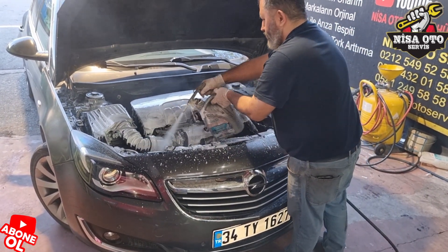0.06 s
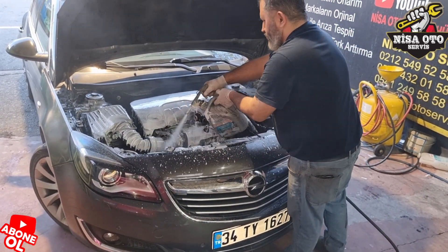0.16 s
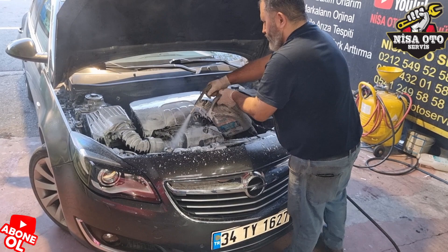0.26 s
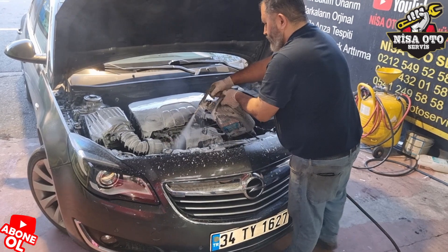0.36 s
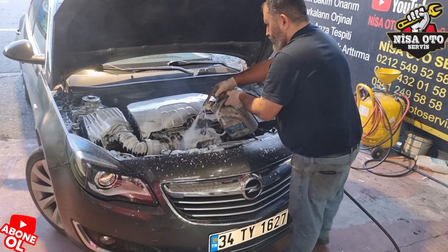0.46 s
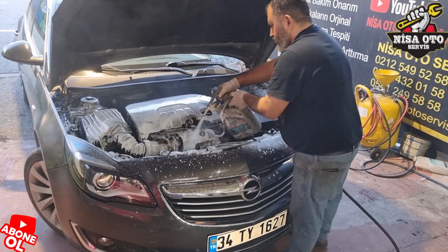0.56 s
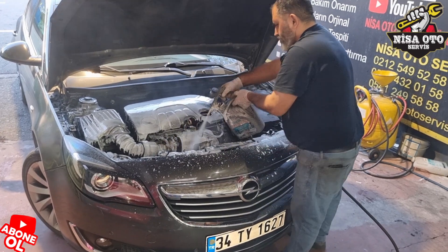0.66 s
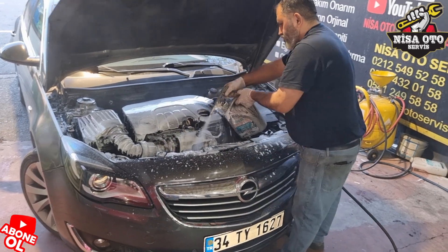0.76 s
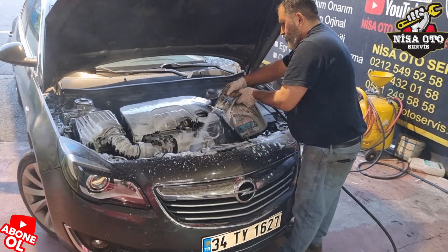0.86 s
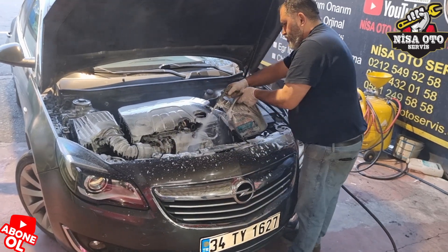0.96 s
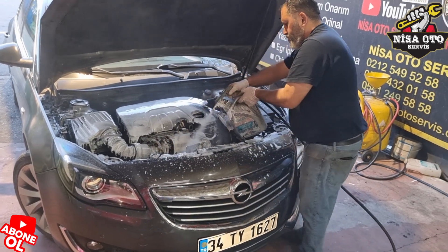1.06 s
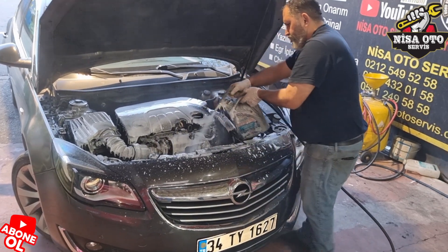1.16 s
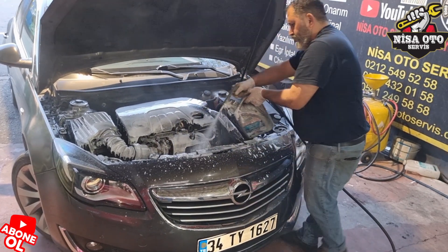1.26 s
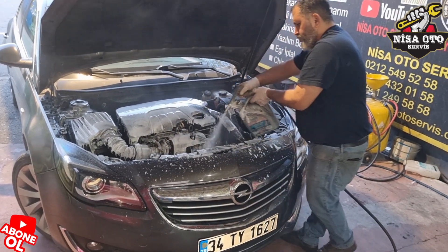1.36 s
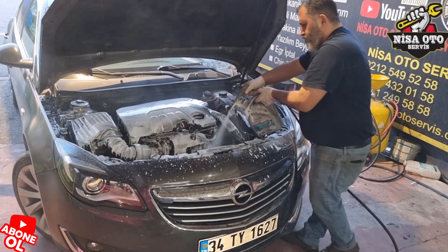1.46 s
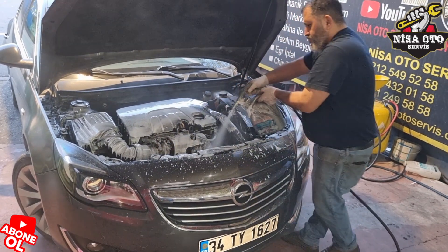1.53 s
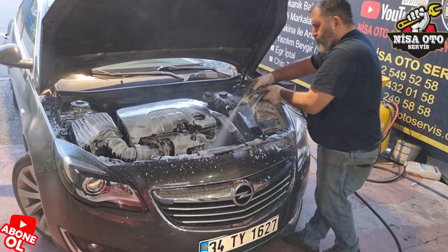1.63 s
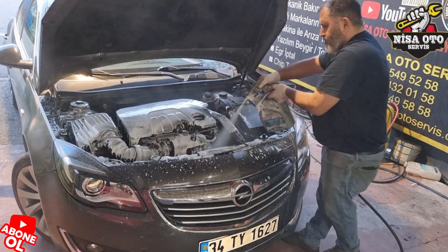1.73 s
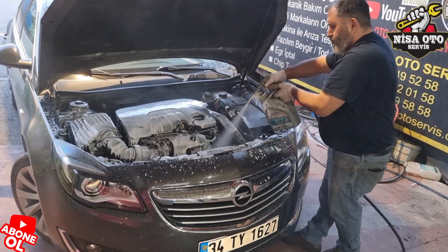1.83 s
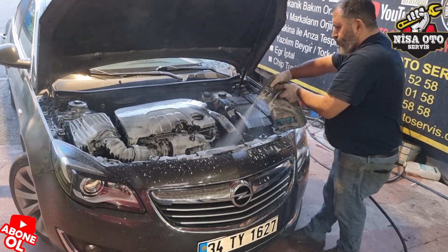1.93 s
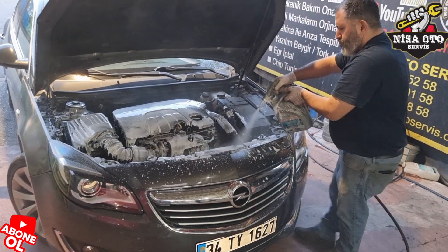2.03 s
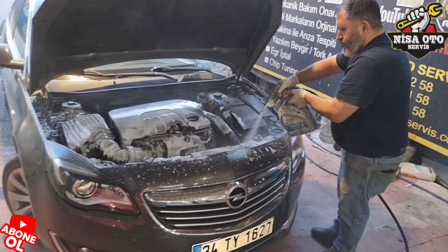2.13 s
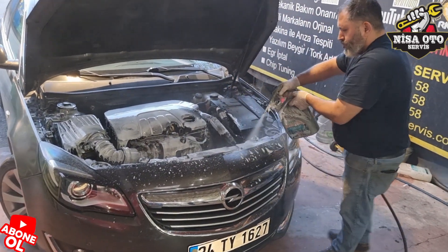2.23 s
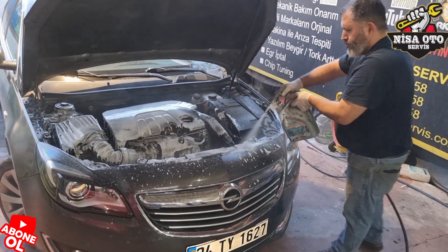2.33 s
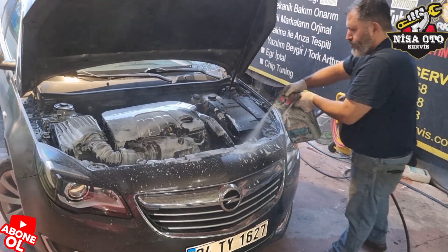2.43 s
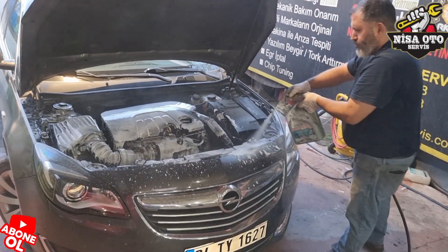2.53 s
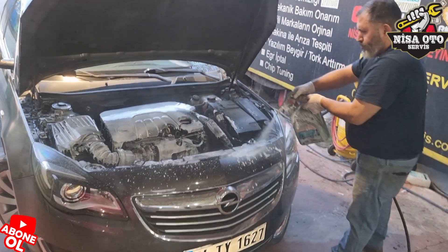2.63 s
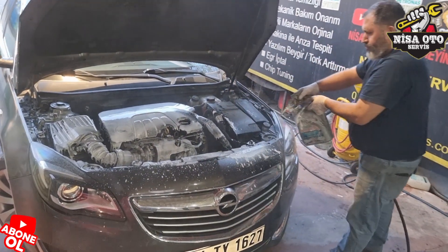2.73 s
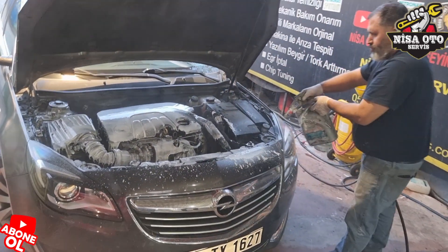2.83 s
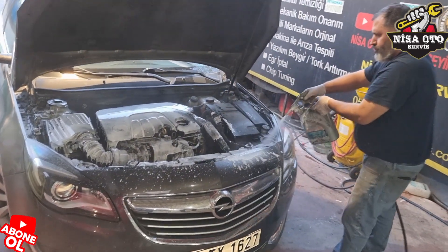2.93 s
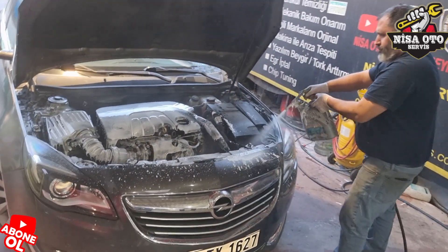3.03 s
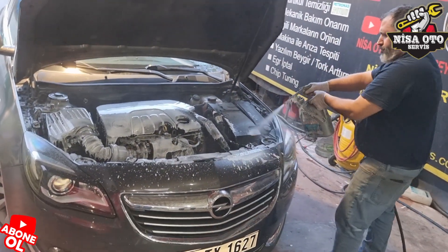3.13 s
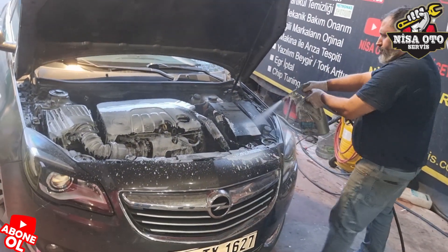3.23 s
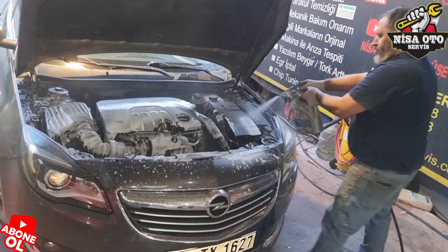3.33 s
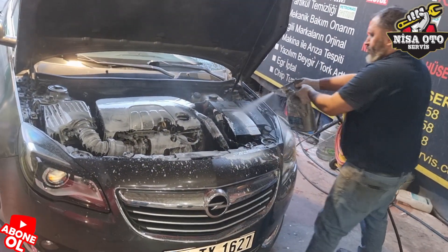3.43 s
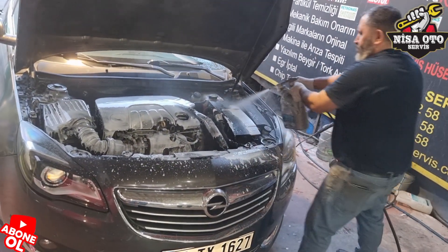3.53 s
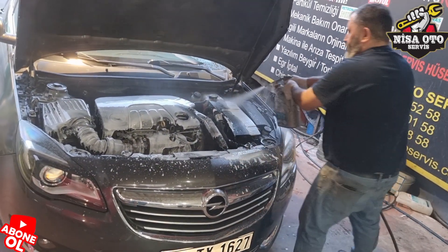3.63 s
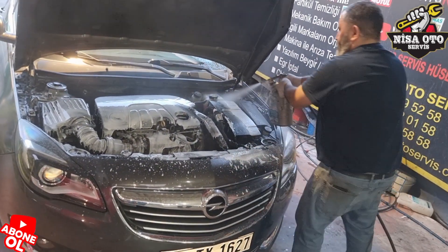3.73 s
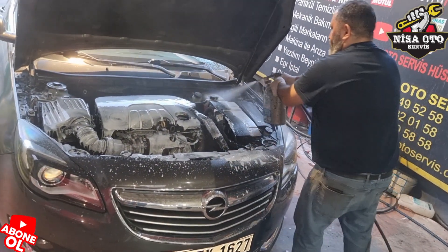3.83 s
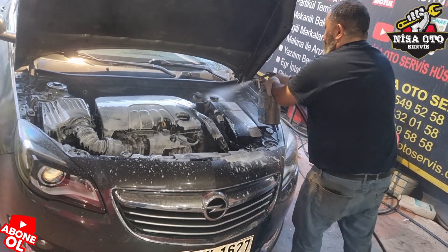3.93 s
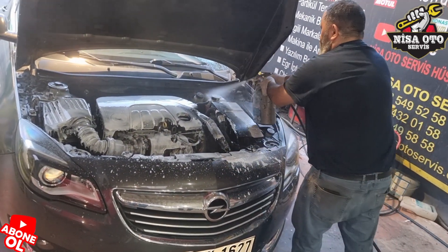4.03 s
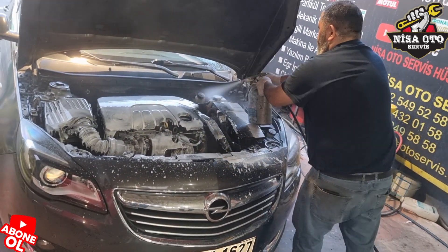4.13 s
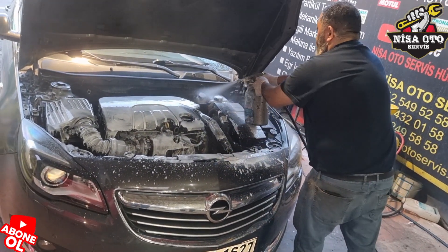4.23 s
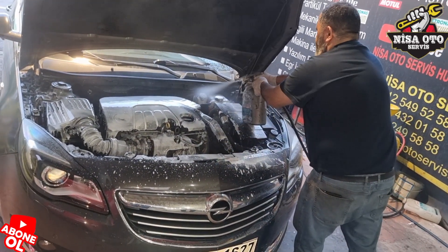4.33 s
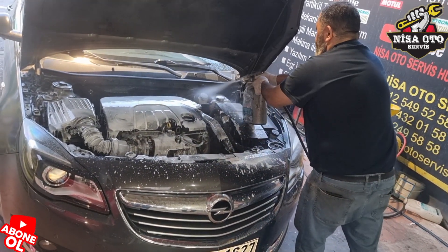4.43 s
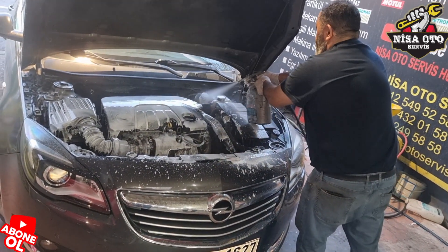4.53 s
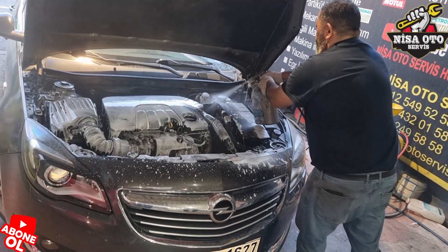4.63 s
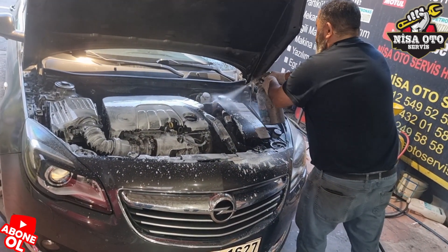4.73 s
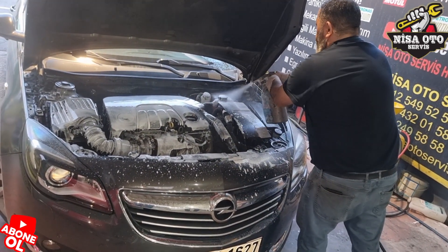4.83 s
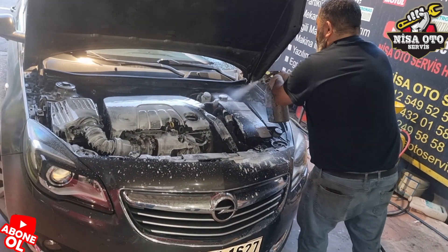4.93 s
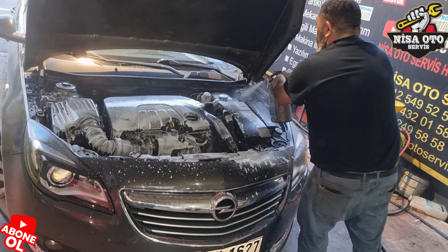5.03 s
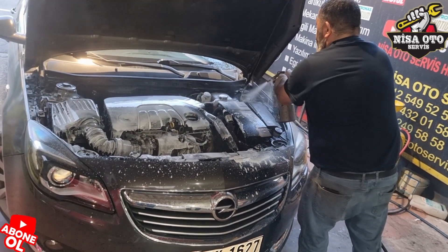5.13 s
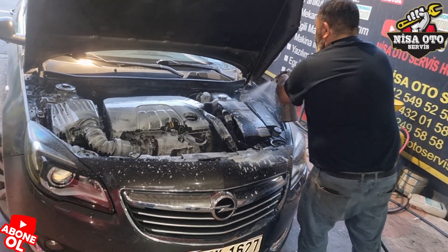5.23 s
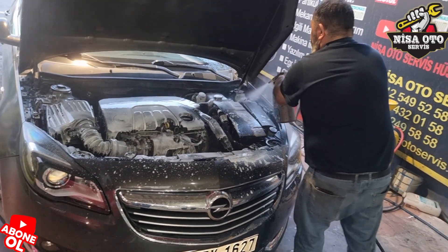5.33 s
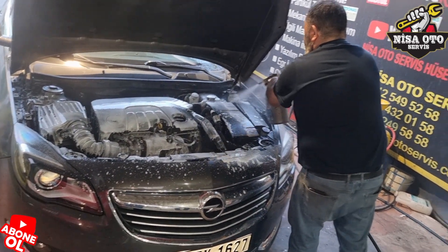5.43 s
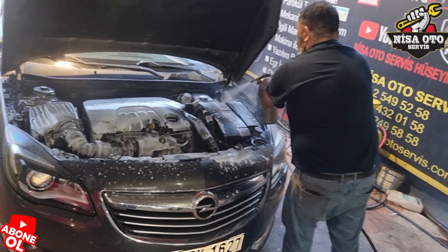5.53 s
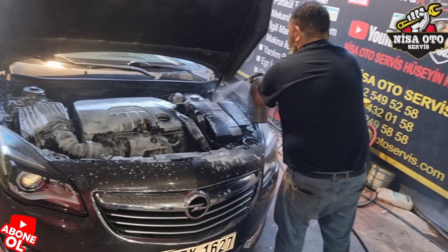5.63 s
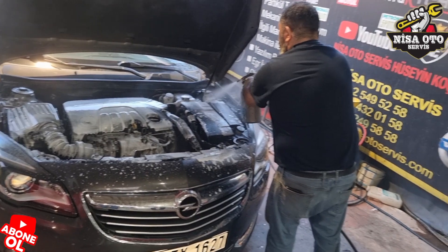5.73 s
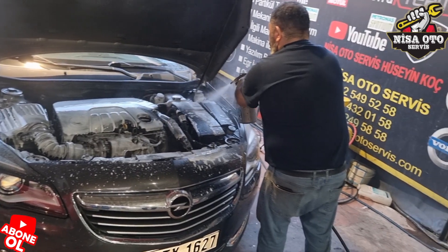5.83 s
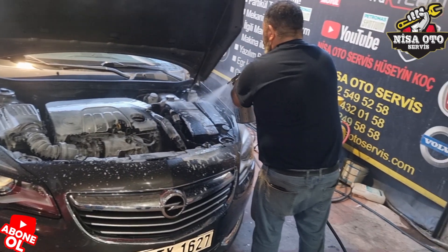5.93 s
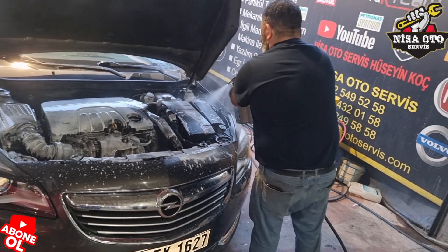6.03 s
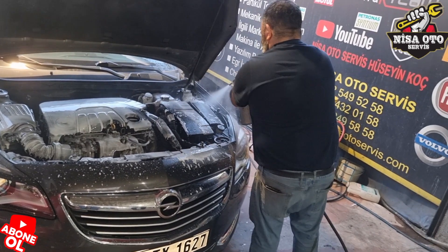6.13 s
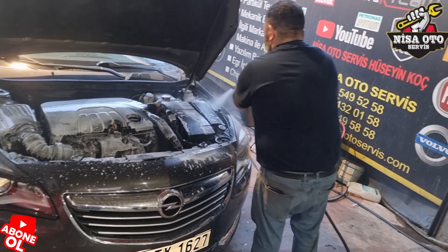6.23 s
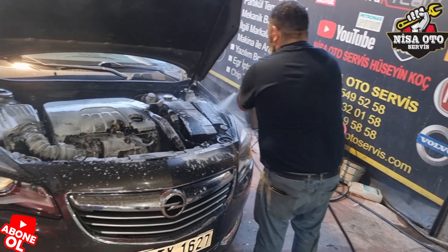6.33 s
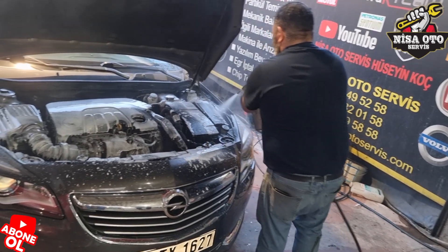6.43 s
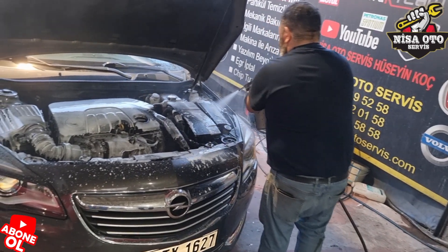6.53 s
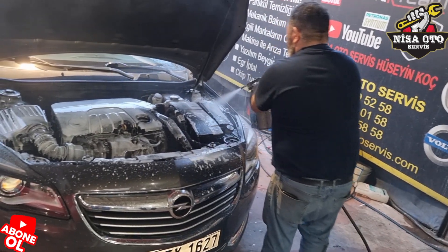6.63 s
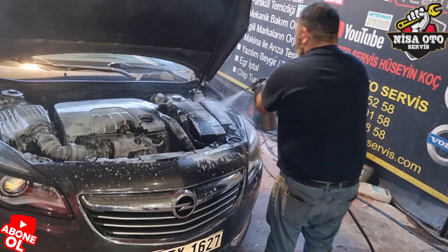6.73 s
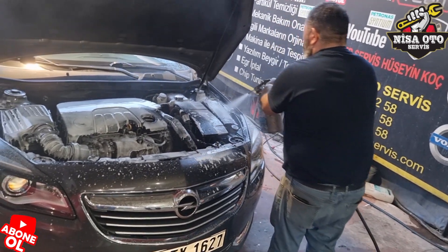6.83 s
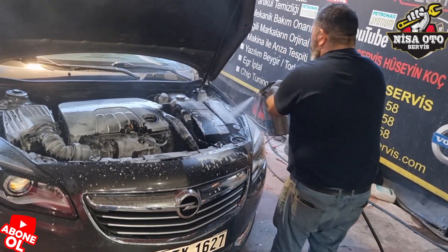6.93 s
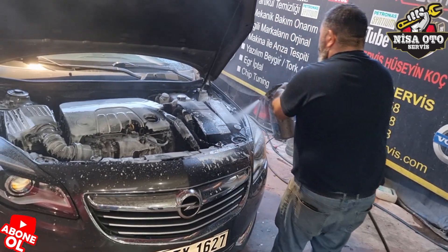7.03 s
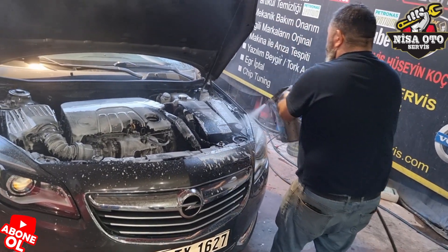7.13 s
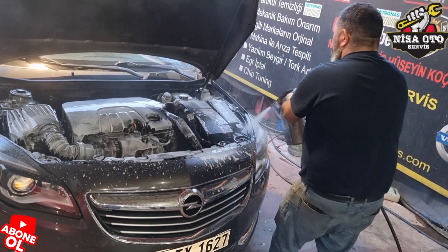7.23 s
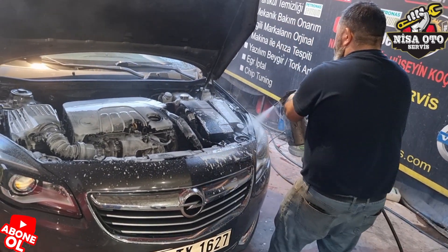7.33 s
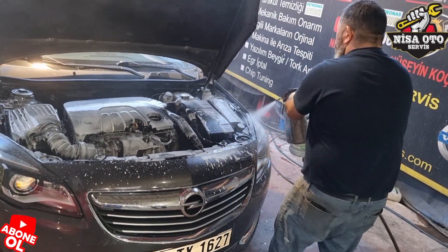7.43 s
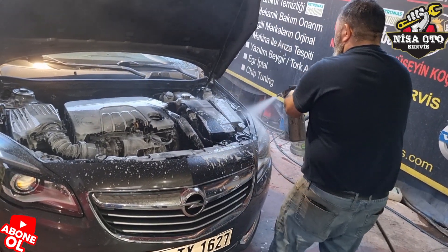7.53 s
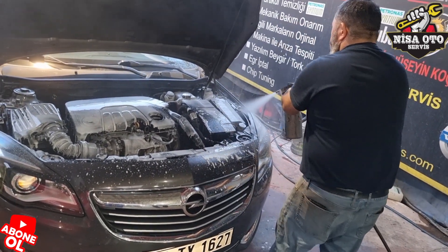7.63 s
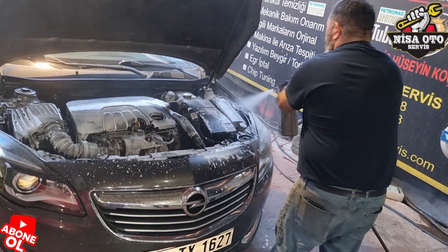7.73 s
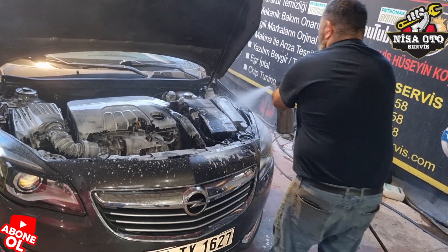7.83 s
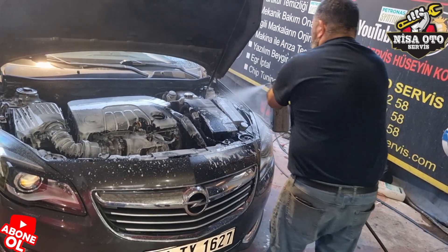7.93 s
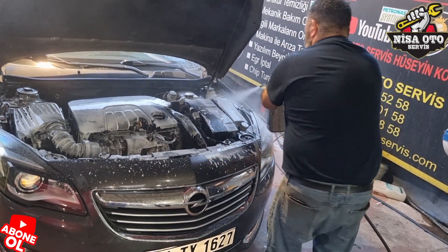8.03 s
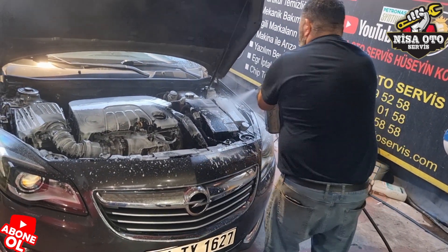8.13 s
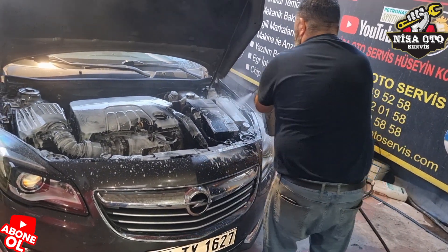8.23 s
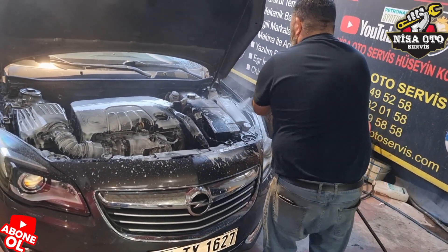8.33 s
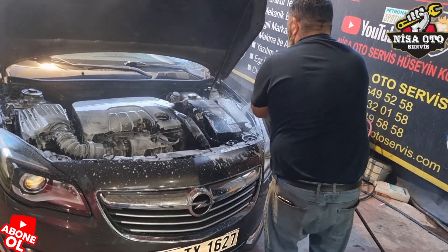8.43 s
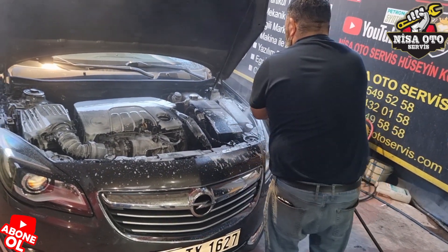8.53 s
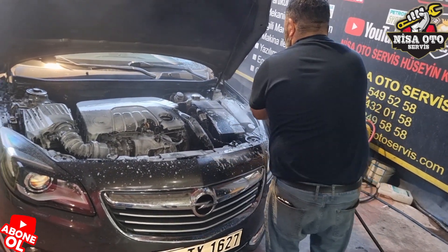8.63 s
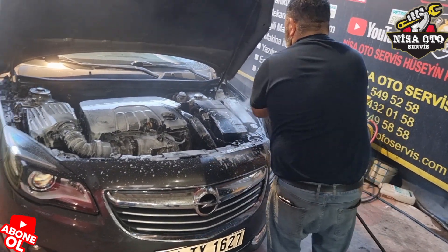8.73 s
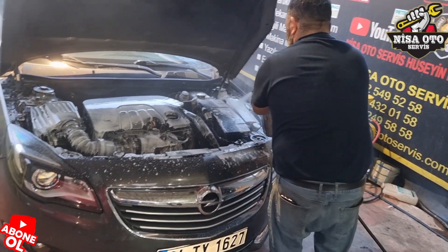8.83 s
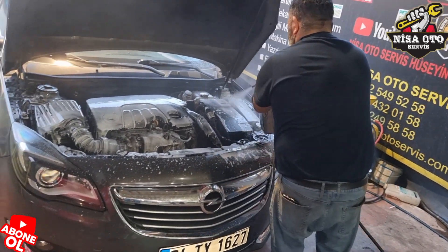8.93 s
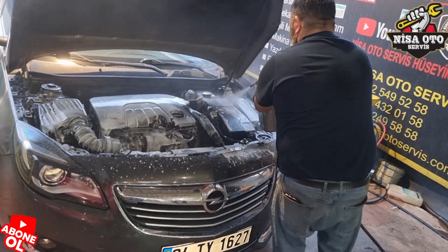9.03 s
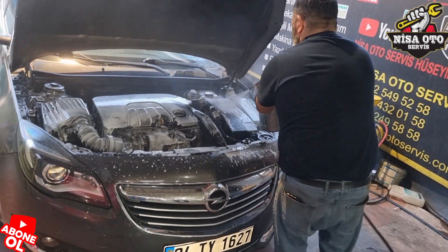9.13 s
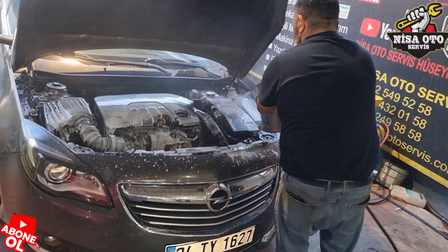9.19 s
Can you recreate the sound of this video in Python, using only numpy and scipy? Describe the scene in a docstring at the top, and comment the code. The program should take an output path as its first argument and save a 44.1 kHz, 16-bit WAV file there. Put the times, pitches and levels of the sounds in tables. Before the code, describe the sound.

In a hard, ringing garage, an air-driven spray gun blasts a bright, dense hiss into an open engine bay. A low rattling drone swells early on. The trigger is released for a fraction of a second, leaving the echo, then pulled again with two hollow knocks. A metal panel clangs shortly after. The hiss continues to the end, over faint traffic rumble, heard close by in stereo.

```python
"""Spray gun in a workshop.

An air-driven gun mists an open engine bay: a shaped noise jet with moving echo streaks, in a ringing hall.
The trigger is let go once, so the hall rings on alone, and is soon pulled again.
Behind: a low drone and a clanging panel (noise resonances and wavering tones), dull knocks (decaying sines),
and the street (lumpy noise rumble) with a machine hum and air-line hiss."""
import sys
import numpy as np
from scipy import signal
from scipy.io import wavfile
from scipy.ndimage import uniform_filter1d

SR = 44100
rng = np.random.default_rng(int(sys.argv[2]) if len(sys.argv) > 2 else 0)


def dump(signal):
    """Clip the signal to [-1, 1] and save it as 16-bit WAV at the path in sys.argv[1]."""
    limited = np.clip(np.atleast_2d(signal).T, -1, 1)
    pcm = np.round(limited * 32767).astype(np.int16)
    wavfile.write(sys.argv[1], SR, pcm)


N = 408366  # samples


def gain_of(db):
    """Amplitude factor of a level in dB."""
    return 10 ** (np.asarray(db) / 20)


def evened(x):
    """Scale to rms 1."""
    return x / np.sqrt(np.mean(x ** 2) + 1e-20)


def read(points, f_hz):
    """Interpolate a (f/Hz, value) table over log frequency."""
    table_hz, value = np.transpose(points)
    return np.interp(np.log(f_hz + 1), np.log(table_hz + 1), value)


def follow(rows, t_s):
    """Interpolate every column of a table over its first, t/s."""
    row_s, *columns = np.transpose(rows)
    return [np.interp(t_s, row_s, column) for column in columns]


def swell(start_s, rise_s, hold_s, fade_db_per_s, level_db):
    """Envelope: linear rise, hold, then a fade at a steady dB rate."""
    t_s = np.arange(N) / SR - start_s
    fade_s = np.clip(t_s - rise_s - hold_s, 0, None)
    return np.clip(t_s / rise_s, 0, 1) * gain_of(level_db - fade_db_per_s * fade_s)


def ringing(f_hz, width_hz):
    """Noise through one resonance (two equal poles): a fuzzy tone of rms 1."""
    pole = np.exp(-np.pi * width_hz / SR)
    carrier = np.exp(2j * np.pi * f_hz * np.arange(N) / SR)
    slow = rng.standard_normal(N) / carrier
    for _ in range(2):
        slow = signal.lfilter([1], [1, -pole], slow)
    return evened((slow * carrier).real)


def steady(f_hz, waver):
    """Fixed-pitch sine whose amplitude wavers by the given rms share."""
    drift = evened(uniform_filter1d(rng.standard_normal(N), size=2500))
    phase = 2 * np.pi * (f_hz * np.arange(N) / SR + rng.random())
    return np.sqrt(2) * (1 + waver * drift) * np.sin(phase)


def patches(frames, bins, long, wide, count=2):
    """Smoothed noise fields (count, bin, frame) of rms 1: blobs over time and frequency."""
    noise = rng.standard_normal((frames, bins, count)).T
    for _ in range(2):
        noise = uniform_filter1d(noise, long, 2)
    return evened(uniform_filter1d(noise, wide, 1))


# jet spectrum: f/Hz, relative level/dB per Hz
JET_SPECTRUM = [(180, -29), (320, -19.5), (480, -20), (900, -16), (1250, -13), (1650, -12.5), (2150, -1),
                (2800, -3.5), (3900, -2), (5200, -1.5), (6200, -5), (7700, -5.5), (8300, -9.5),
                (11000, -12), (13000, -9), (15500, -8)]
# centres of wash, roar, hiss, sizzle, fizz: f/Hz
BAND_CENTRES_HZ = [1250, 2300, 3700, 6000, 11500]
# gun sweep: t/s, level change/dB, extra wash level/dB, extra hiss-band level/dB
GUN_SWEEP = [(0.0, 0.5, -2, -3), (0.25, .5, -0.5, 1.5), (0.75, 0.46, 1.5, -1.8), (1.4, 0.55, 0.5, -0.5),
             (1.75, 0, -0.5, -1), (2.2, .3, 1.5, 0.1), (2.6, -0.2, 0, 1.5), (3.2, 0.45, 0, -2.5),
             (3.7, -0.9, -3, 4), (4.2, -1.1, 1.5, .5), (4.7, -0.5, 0, -1), (5.15, -0.7, -.5, 2.5),
             (5.6, 0, -1.5, 0.7), (6.2, 0, -0.2, -1.5), (7.1, 1.14, -2.5, -0.5), (7.6, -0.8, -0.5, -.5),
             (7.95, 1, -1.5, -5), (8.45, -0.1, -1.5, 3), (8.85, -1, -0.5, 1), (9.26, 0, 1, -1)]
# channel balance: f/Hz, left-right level/dB
CHANNEL_TILT = [(60, 1.0), (120, -1), (240, -1.5), (480, 0), (950, -0.5), (1890, -1.5), (3770, -5),
                (7520, 2), (15000, -2)]
# trigger: let go t/s, pressure decay constant/s, pulled t/s, rise/s
TRIGGER_TIMES = (2.670, .011, 2.871, .021)
JET_DB = -20  # 3-8 kHz rms of the channel mean, trigger held
DRIFT_DB, DRIFT_FRAMES = 0.6, 24  # each band's own wander
ROAR_SHARE = 0.92  # roar follows wash by this much
PATCH_DB, SPIT_DB = 0.44, -0.58  # spectral blobs; feed flutter at 14 kHz and above
DELAY_S, BEND_RAD = -7e-5, 1.69  # interchannel phase: linear part, wander rms


def jet_field_db(frames, f_hz):
    """Level of the turbulent jet (channel, bin, frame) as aim and liquid feed vary."""
    level_db, wash_db, hiss_db = follow(GUN_SWEEP, np.arange(frames) * 256 / SR)
    bands = len(BAND_CENTRES_HZ)
    wander = patches(frames, bins=bands, long=DRIFT_FRAMES, wide=1, count=1)[0]
    shifts_db = level_db + DRIFT_DB * wander
    shifts_db[:3] += [wash_db, ROAR_SHARE * wash_db, hiss_db]
    weights = np.array([read(list(zip(BAND_CENTRES_HZ, row)), f_hz) for row in np.eye(bands)])
    field_db = read(JET_SPECTRUM, f_hz)[:, None] + weights.T @ shifts_db
    field_db = field_db + PATCH_DB * patches(frames, len(f_hz), long=7, wide=10, count=1)
    # uneven liquid feed: one flutter for all pitches, deeper towards the finest mist
    feed = evened(uniform_filter1d(rng.standard_normal(frames), size=7))
    field_db += SPIT_DB * np.clip(f_hz / 14000, 0, 1)[:, None] * feed
    return field_db + np.array([0.5, -0.5])[:, None, None] * read(CHANNEL_TILT, f_hz)[:, None]


def jet_paths(frames, f_hz):
    """Direct path plus bonnet and engine echoes: narrow streaks, different in each channel."""
    bins = len(f_hz)
    # short waves are reshuffled sooner by the same movement
    quick = np.clip(f_hz / 11000, 0, 1)[:, None]
    echo = np.sqrt(1 - quick) * patches(frames, bins, long=30, wide=2, count=4)
    echo += np.sqrt(quick) * patches(frames, bins, long=7, wide=3, count=4)
    bend_rad = BEND_RAD * patches(frames, bins, long=60, wide=12, count=1)[0]
    phase_rad = 2 * np.pi * f_hz[:, None] * DELAY_S + bend_rad
    direct = np.exp(1j * np.array([0, 1])[:, None, None] * phase_rad)  # right channel only
    return direct + echo[:2] + 1j * echo[2:]


def trigger():
    """Pressure gain: exponential decay on release, quadratic rise on pull, last fifth settling."""
    off_s, decay_s, on_s, rise_s = TRIGGER_TIMES
    t_s = np.arange(N) / SR
    closing = np.exp(-np.clip(t_s - off_s, 0, None) / decay_s)
    settling = 1 - 0.2 * np.exp(-np.clip(t_s - on_s, 0, None) / 0.017)
    opening = np.clip((t_s - on_s) / rise_s, 0, 1) ** 2 * settling
    return np.minimum(closing + opening, 1)


def spray():
    """One turbulent noise jet, coloured by aim and shifting echo paths, gated by the trigger."""
    frames, f_hz = N // 256 + 5, np.fft.rfftfreq(1024, 1 / SR)
    field_db = jet_field_db(frames, f_hz)
    real, imag = rng.standard_normal((frames, len(f_hz), 2)).T
    spectra = (real + 1j * imag) * jet_paths(frames, f_hz) * gain_of(field_db)
    jet = signal.istft(spectra, nperseg=1024, noverlap=768)[1][:, :N]
    bandpass = signal.butter(6, [3000, 8000], "band", fs=SR, output="sos")
    band = signal.sosfilt(bandpass, jet.mean(0))
    jet *= gain_of(JET_DB) / np.sqrt(np.mean(band ** 2))
    return jet * trigger()


# reverberation: f/Hz, t60/s
HALL_T60 = [(150, 0.44), (600, 1.15), (1400, 1.1), (2300, 1.2), (5000, 0.75), (9000, 0.51), (15000, 0.25)]
JET_HALL_DB, FAR_HALL_DB = -6, -4.0  # hall gain for the jet, for the far sounds


def hall(x):
    """Sparse random-sign echoes, one per 20 samples, each band dying at its own rate."""
    taps = np.zeros((2, SR))
    jitter = rng.integers(0, 20, (2, (SR - 401) // 20))
    at = np.arange(400, SR - 20, 20) + jitter
    np.put_along_axis(taps, at, rng.choice([-1., 1.], at.shape), 1)
    f_hz, t_s, z = signal.stft(taps, SR, nperseg=256)
    z = z * gain_of(-60 * t_s / read(HALL_T60, f_hz)[:, None])
    z /= np.linalg.norm(z, axis=2, keepdims=True) + 1e-12  # equal energy per band
    apart = np.clip(f_hz / 500, 0, 1)[:, None]  # long waves reach both channels alike
    z[1] = np.sqrt(1 - apart) * z[0] + np.sqrt(apart) * z[1]
    tail = signal.istft(z, SR, nperseg=256)[1]
    return signal.fftconvolve(x, tail / np.linalg.norm(tail[0]), axes=1)[:, :N]


# layers shaking panel, lowest ring, high ring, lingering hum:
# start t/s, swell/s, hold/s, fade/(dB/s), nominal level/dB
CLANG_LAYERS = [(3.767, 0.037, 0.092, 102, -21.5), (3.77, .04, 0.094, 95, -29),
                (3.777, 0.027, .18, 300, -32.5), (3.95, 0.49, .9, 117, -44)]
# panel modes: f/Hz, width/Hz, relative level/dB before sqrt(width) weighting
PANEL_MODES = [(135, 45, -6), (303, 100, -5), (413, 23, -3), (651, 12, 1.5), (772, 28, -4), (867, 25, -11),
               (990, 19, 1), (950, 16, 3.5), (1390, 23, 0)]
PANEL_LOW_HZ, PANEL_HIGH_HZ = 275, 1199


def clang():
    """Shaken metal sheet: many brief modes, two clear rings, the lowest lingering."""
    shake, ring, high, hum = (swell(*row) for row in CLANG_LAYERS)
    modes = evened(sum(gain_of(db) * np.sqrt(w) * ringing(f, w) for f, w, db in PANEL_MODES))
    rattle = np.array([ringing(630, width_hz=990) for channel in range(2)])
    body = 0.64 * np.array([np.roll(modes, 14), modes]) + 0.62 * rattle  # left 14 samples late
    low_tone = 0.7 * steady(PANEL_LOW_HZ, waver=0.25) + 0.2 * ringing(PANEL_LOW_HZ, width_hz=14.0)
    linger = 0.68 * ringing(PANEL_LOW_HZ, width_hz=8.2) + 0.87 * ringing(215, width_hz=190)
    high_tone = steady(PANEL_HIGH_HZ, waver=0.23)
    return shake * body + ring * low_tone + hum * linger + high * high_tone


# layers deep tones, middle tones, upper tone, loose rattle:
# start t/s, swell/s, hold/s, fade/(dB/s), nominal level/dB
DRONE_LAYERS = [(.295, 0.15, 0.23, 49, -27.5), (.296, .05, .1, 18, -28.5), (.3, .04, 0.49, 67, -39),
                (.3, .04, 0.071, 27, -31)]
# deep tones: f/Hz, relative level/dB
DRONE_DEEP = [(72, -6), (119, -3), (145, -3)]
# middle tones: f/Hz, relative level/dB
DRONE_MIDDLE = [(220, -2), (246, -1), (291, 0), (366, -9.5), (441, -14)]
DRONE_TOP_HZ = 550
MID_END_S, MID_DECAY_S = 0.82, 0.1  # extra decay of the middle tones: start, time constant


def drone():
    """Low tones of some machine or vehicle with a rattle: noise resonances that swell and fade."""
    low, mid, top, rattle = (swell(*row) for row in DRONE_LAYERS)
    deep = sum(gain_of(db) * ringing(f, width_hz=10.5) for f, db in DRONE_DEEP)
    deep = evened(deep + 0.34 * ringing(130, width_hz=57))
    body = evened(sum(gain_of(db) * ringing(f, width_hz=29.0) for f, db in DRONE_MIDDLE))
    middle = 0.73 * body + 0.5 * ringing(230, width_hz=300)
    stop = np.exp(-np.clip(np.arange(N) / SR - MID_END_S, 0, None) / MID_DECAY_S)
    upper = steady(DRONE_TOP_HZ, waver=0.4)
    return low * deep + stop * mid * middle + top * upper + rattle * ringing(640, width_hz=560)


# dull knocks: t/s, nominal level/dB, f/Hz, t60/s, overtone share
KNOCK_EVENTS = [(2.971, -21.5, 391, 0.12, 0.39), (3.005, -16, 396, 0.063, 0.25),
                (9.156, -21, 189, 0.074, 0.72)]


def knocks():
    """Short hollow rings: decaying sine, two inharmonic overtones, soft onset."""
    out, t_s = np.zeros(N + 8000), np.arange(8000) / SR
    onset = 1 - np.exp(-t_s / 0.0066)
    for start_s, level_db, f_hz, t60_s, share in KNOCK_EVENTS:
        phase = 2 * np.pi * f_hz * t_s
        tone = np.sin(phase) + share * (np.sin(1.9 * phase) + np.sin(2.4 * phase))
        out[round(start_s * SR):][:8000] += gain_of(level_db - 60 * t_s / t60_s) * onset * tone
    return out[:N]


# rumble likeness: f/Hz, left-right correlation
RUMBLE_LIKENESS = [(40, 0.25), (180, 1), (500, 1)]


def pair(field_db, size):
    """Random spectra on a dB field (channel, bin, frame), partly alike in both channels."""
    f_hz = np.fft.rfftfreq(size, 1 / SR)
    a, b, c, d = rng.standard_normal((field_db.shape[2], len(f_hz), 4)).T
    same = np.clip(read(RUMBLE_LIKENESS, f_hz), -1, 1)[:, None]
    left = a + 1j * b
    right = same * left + np.sqrt(1 - same ** 2) * (c + 1j * d)
    z = np.array([left, right]) * gain_of(field_db)
    return signal.istft(z, nperseg=size, noverlap=size - size // 4)[1][:, :N]


# rumble spectrum: f/Hz, relative level/dB per Hz
STREET_SPECTRUM = [(15, -52), (25, -22), (41, -11.5), (65, -4.5), (82, 0.5), (107, -3), (264, -5),
                   (295, -7.5), (464, -29), (500, -9), (650, -10), (1100, -120)]
# machine hum: f/Hz, width/Hz, level/dB
MACHINE_HUM = (68.6, 27, -47.5)
STREET_DB, AIR_DB = -45, -41.5  # rms of the rumble, of the air-line hiss


def street():
    """Traffic rumble as lumpy low noise, a machine hum and air-line hiss as noise resonances."""
    frames, f_hz = N // 512 + 5, np.fft.rfftfreq(2048, 1 / SR)
    lumps_db = 1.9 * patches(frames, len(f_hz), long=8, wide=6, count=1)
    field_db = read(STREET_SPECTRUM, f_hz)[:, None] + lumps_db
    rumble = gain_of(STREET_DB) * evened(pair(field_db.repeat(2, 0), size=2048))
    hum_hz, width_hz, hum_db = MACHINE_HUM
    hum = gain_of(hum_db) * ringing(hum_hz, width_hz)
    air = gain_of(AIR_DB) * np.array([ringing(2900, width_hz=3600) for channel in range(2)])
    return rumble + hum + air


def scene():
    """Jet and far sounds, direct and through the hall, over the street."""
    jet = spray()
    far = drone() * gain_of([[0.], [-0.1]]) + clang() * gain_of([[-0.6], [0.6]]) + knocks()
    # three random tails take turns, 1.1 Hz, so the hall's colour keeps shifting
    turn = 2 * np.pi * 1.1 * np.arange(N) / SR
    shares = [np.sqrt((1 + np.cos(turn + k * 2 * np.pi / 3)) / 3) for k in range(3)]
    wet = sum(hall(jet * share) for share in shares)
    return jet + gain_of(JET_HALL_DB) * wet + far + gain_of(FAR_HALL_DB) * hall(far) + street()


EDGE_HZ = 15760


def record(dry):
    """Low-pass, clip at full scale, low-pass again."""
    lowpass = signal.firwin(1023, EDGE_HZ, window=("kaiser", 9), fs=SR)[None]
    cut = signal.oaconvolve(dry, lowpass, "same")
    return signal.oaconvolve(np.clip(cut, -1, 1), lowpass, "same")


dry = scene()
out = record(dry)
dump(out)
```